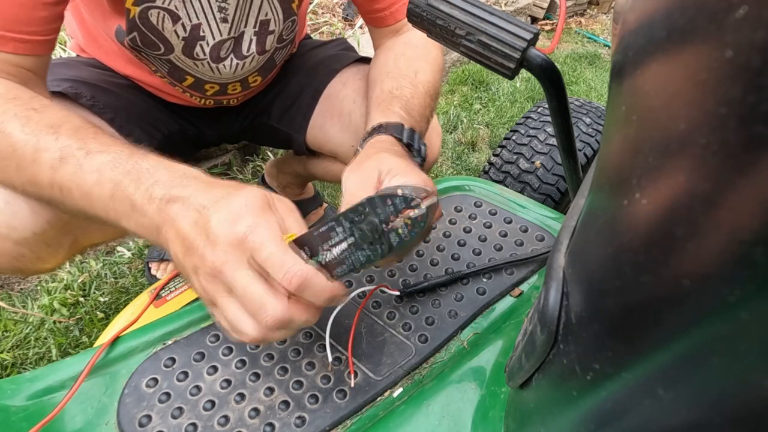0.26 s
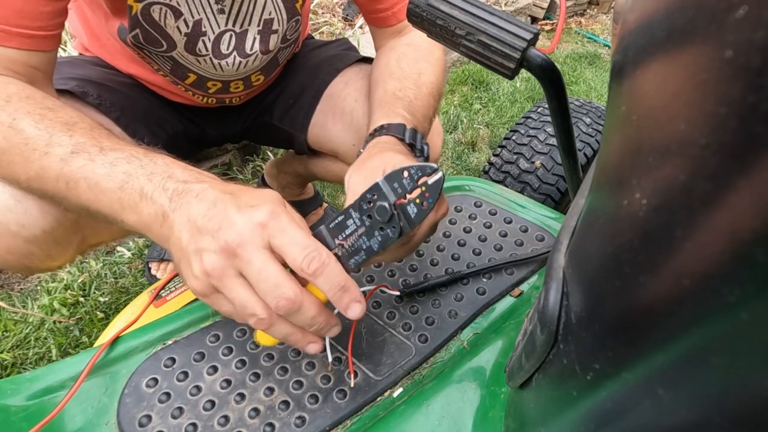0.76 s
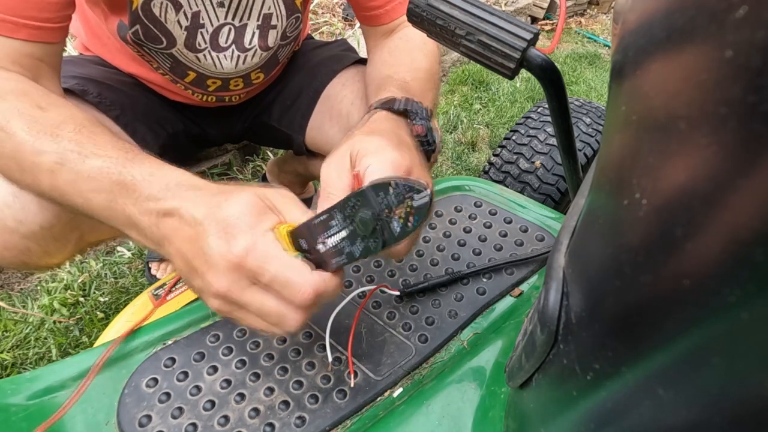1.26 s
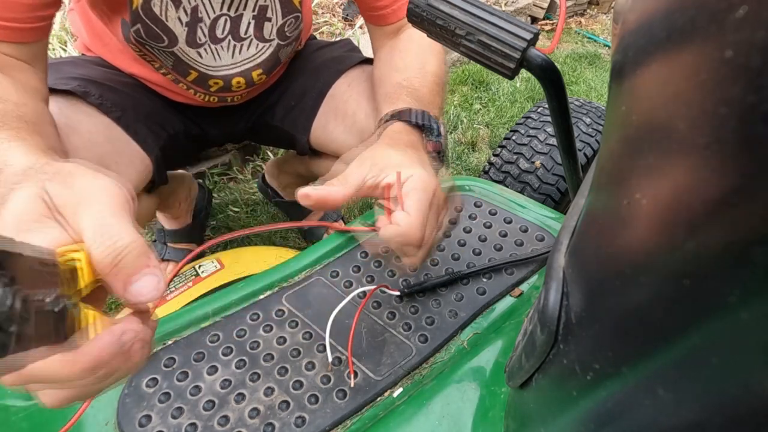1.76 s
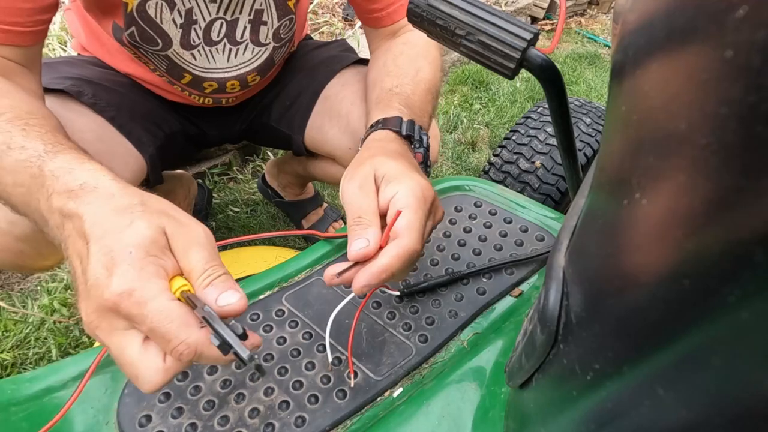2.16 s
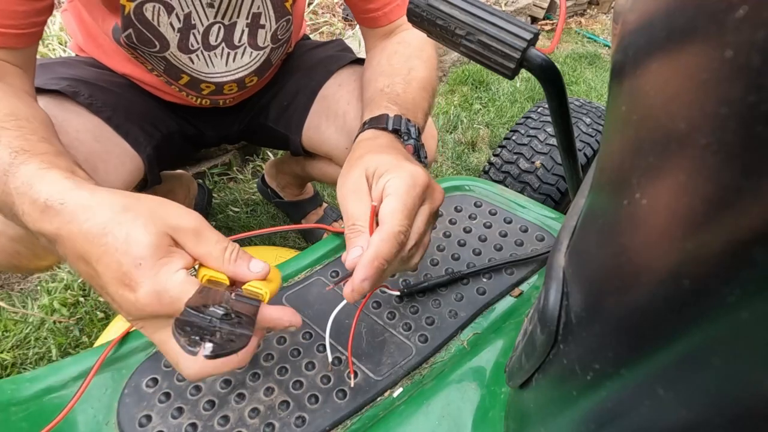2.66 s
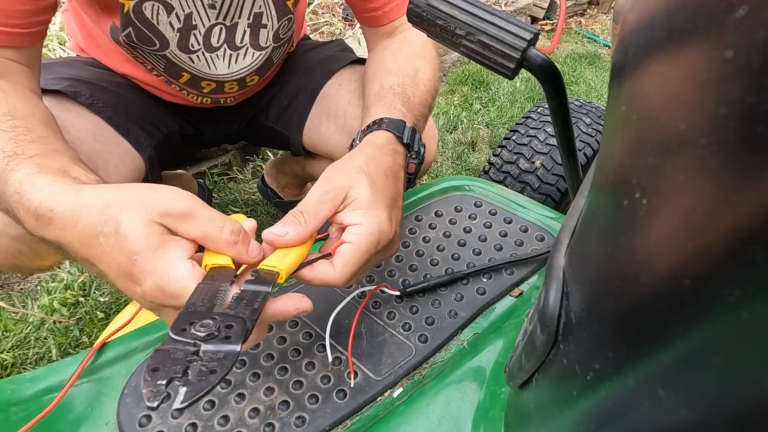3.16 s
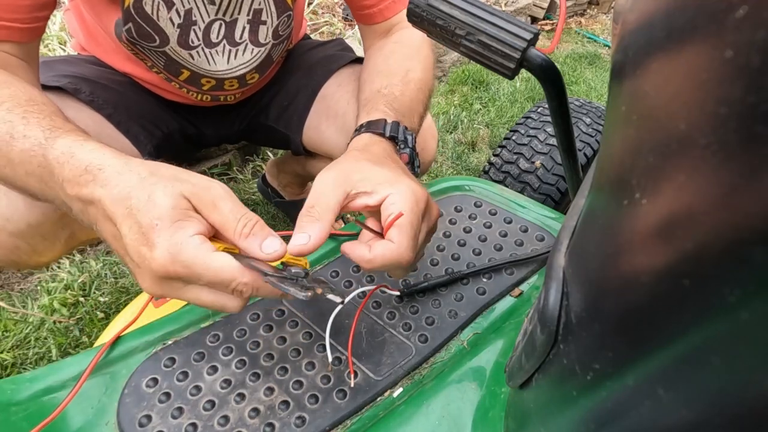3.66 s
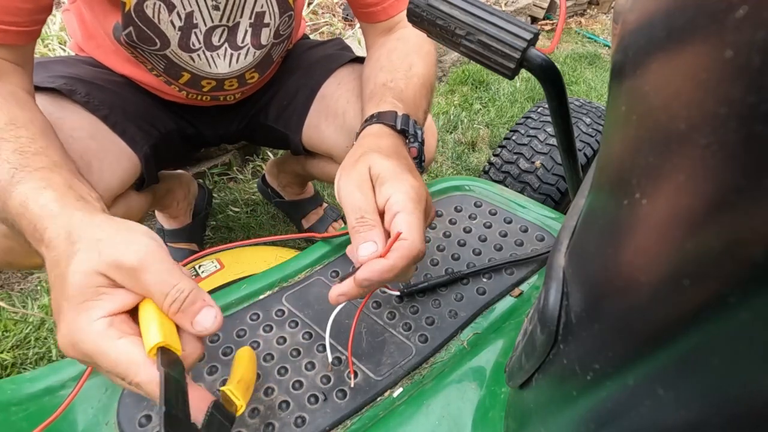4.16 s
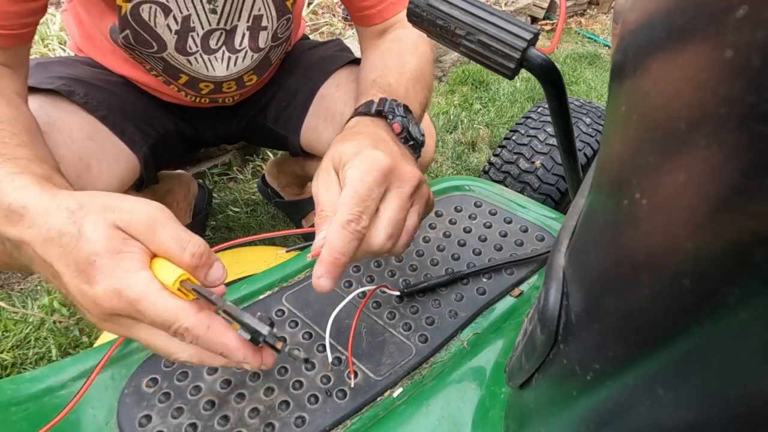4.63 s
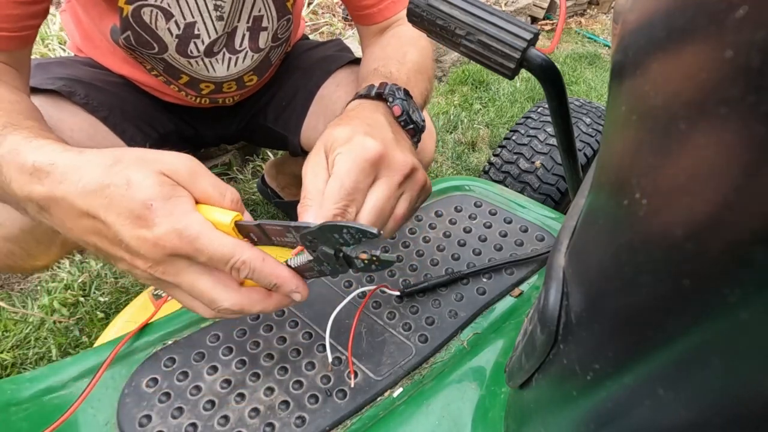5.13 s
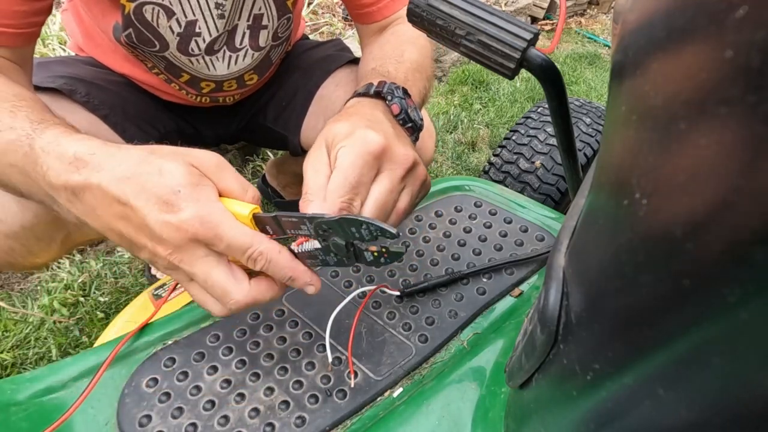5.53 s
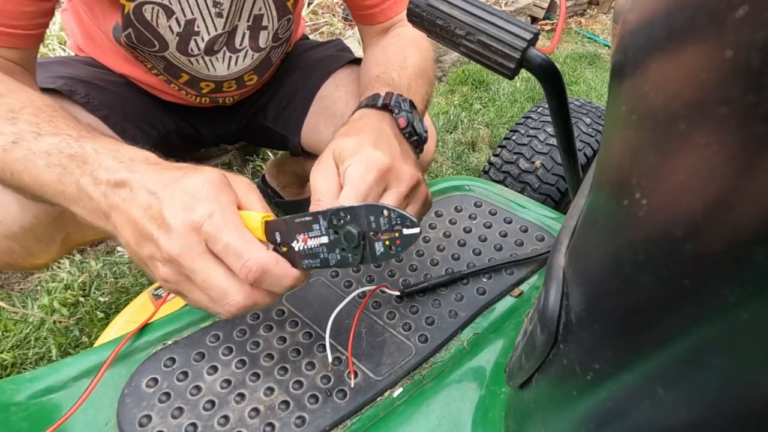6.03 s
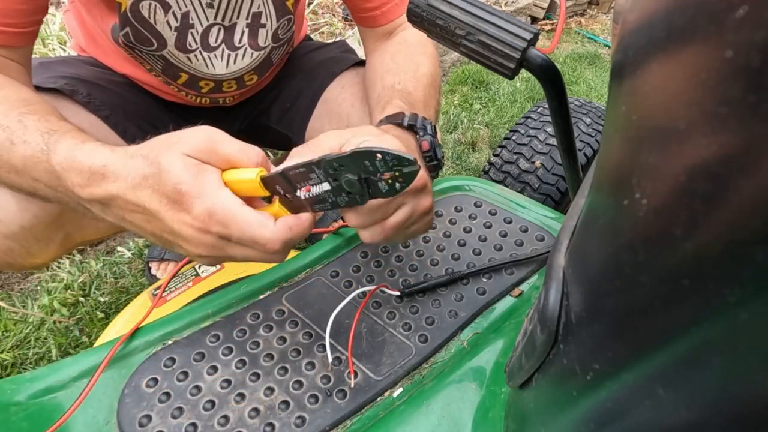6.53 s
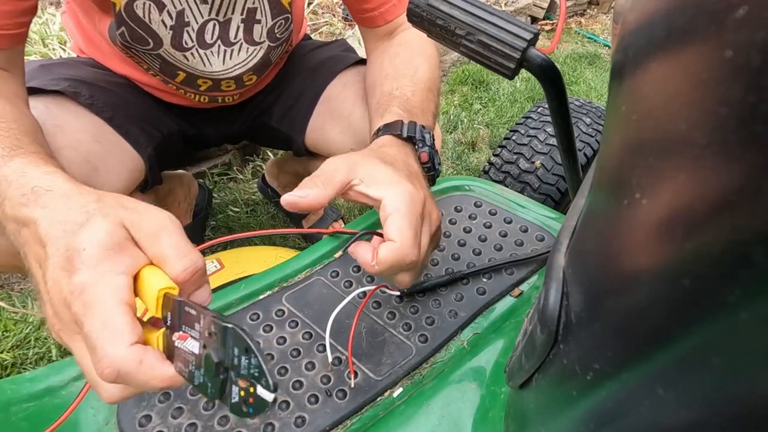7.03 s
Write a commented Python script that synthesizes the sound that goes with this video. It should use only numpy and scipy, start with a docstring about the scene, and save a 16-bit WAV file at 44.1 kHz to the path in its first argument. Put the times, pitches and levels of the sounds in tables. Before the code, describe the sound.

Hand wire strippers click and snap close by, bumping a hollow mower body, while an engine runs some way off outdoors.

```python
"""A tool knocks on a hollow body and steel jaws click, close to the microphone: someone crouches on
a lawn by a parked riding mower, stripping wires. The hand strippers snap and ring, bump the mower's
panels, and near the end drag a sleeve of insulation off the copper. Some way off an engine runs,
creeping up in speed, beside a fainter machine hum. Air buffets the microphone; small birds call far away."""
import sys
import numpy as np
from scipy import signal
from scipy.fft import rfft, irfft
from scipy.io import wavfile
from scipy.ndimage import uniform_filter1d

SR = 44100
rng = np.random.default_rng(int(sys.argv[2]) if len(sys.argv) > 2 else 0)


def bounce(signal):
    """Save signal as a 16-bit WAV file at the path given by the first command-line argument."""
    frames = np.transpose(np.atleast_2d(signal))
    limited = np.clip(frames, -1, 1)
    pcm = np.round(limited * 32767).astype(np.int16)
    wavfile.write(sys.argv[1], SR, pcm)


N = 321489

# How alike noise is at the two sides of the microphone. Each row: frequency in Hz, correlation.
LIKENESS = [(60, 0.97), (150, 1), (380, 0.94), (950, 0.72), (2380, 0.45), (5980, 0.67), (15000, 0.1)]
# Distant outdoor wash. Each row: frequency in Hz, relative density in dB.
WASH_SPECTRUM = [(180, -34.5), (300, -1.5), (450, -9), (850, -8), (980, -5), (1200, -9), (1750, -14.5),
                 (4200, -18), (7400, -23.5), (8200, -31.5), (10000, -32.5), (12500, -42.5), (13800, -48),
                 (16000, -62)]
# The wash swells slightly. Each row: time in seconds, gain in dB.
WASH_SWELL = [(0.3, -0.6), (0.9, 0.4), (2.8, 0.5), (3.5, 0), (7.29, 0)]
# Low rumble of air and engine. Each row: frequency in Hz, relative density in dB.
RUMBLE_SPECTRUM = [(10, -24), (24, 17), (45, 5.5), (65, 6), (110, 1.5), (190, -6.5), (260, -14.5),
                   (380, -41.5), (700, -68.5)]
# Far birds. Each row: start and length in seconds, first and last pitch in Hz, level in dB.
CHIRPS = [(0.463, 0.062, 2600, 2180, -56), (0.566, 0.11, 2140, 2660, -62), (0.965, .07, 2260, 2390, -66),
          (1.014, .034, 3260, 3370, -54.5), (1.05, 0.06, 2520, 2330, -60.5),
          (5.732, 0.027, 3420, 3430, -60), (5.75, 0.025, 3340, 3220, -49), (5.768, 0.017, 3260, 3370, -48),
          (5.801, 0.075, 3280, 3330, -55), (5.776, .025, 2380, 2130, -60), (5.792, 0.047, 2150, 2100, -57),
          (5.872, 0.026, 2680, 2600, -56), (5.894, 0.034, 2240, 2430, -56), (6.8, 0.15, 3420, 3450, -60)]
# A second machine, far off. Each row: frequency in Hz, relative level in dB.
HUM_LINES = [(273.5, -54), (328, -57.5), (383, -57.5), (537, -61), (657, -65), (772, -62.5)]
# The engine's firing tone at the microphone. Each row: time in seconds, level in dB.
FIRING_LEVEL = [(0, -37.5), (0.4, -33), (0.7, -25.5), (0.98, -25), (1.13, -38), (1.32, -20.5), (1.55, -32),
                (1.77, -23), (2.1, -27.5), (2.9, -29.5), (3.75, -26.5), (4.25, -30.5), (4.58, -29),
                (4.85, -31), (5.8, -25), (6.4, -29.5), (7.29, -29)]
# The octave above that tone. Each row: time in seconds, relative level in dB.
OCTAVE_LEVEL = [(0, -47.5), (0.8, -38.5), (1.5, -36.5), (2.12, -41), (2.3, -33), (2.6, -37), (2.95, -40),
                (3.5, -49.5), (6.1, -46.5), (7.29, -51.5)]
# Other engine orders. Each row: multiple of the firing rate, level in dB against the octave.
ENGINE_ORDERS = [(0.702, -9), (1.502, -23), (2.498, -19.5), (3, -34.5), (4.002, -36.5)]
# Air on the microphone. Each row: centre in seconds, level in dB, length in seconds, upper edge in Hz.
BUFFETS = [(2.152, -25.5, 0.08, 129), (2.495, -27.5, .2, 44.6), (3.039, -17.5, 0.11, 68),
           (3.086, -22, 0.042, 70), (3.163, -22, 0.07, 105), (3.2, -21.5, 0.072, 54.5),
           (3.488, -33.5, 0.16, 49.7), (4.598, -25.5, .08, 86), (6.994, -32, .2, 48.5)]
# Soft jolts of the microphone. Each row: time in seconds, relative level in dB, strongest frequency in Hz.
BUMPS = [(3.031, -6, 64.5), (3.046, -10, 75), (3.056, -8, 110), (3.075, -10, 70.6), (3.188, -6.5, 101),
         (3.249, -15.5, 98), (4.16, -1, 93), (4.387, -3.5, 49.7)]
# Fingers sliding on wire and grips. Each row: start and length in seconds, level in dB.
FINGER_RUBS = [(1.07, 0.077, -72), (1.176, 0.12, -68), (1.7, 0.2, -71), (2.12, .06, -72), (2.45, 0.2, -75),
               (3.478, .09, -73), (3.68, 0.06, -71), (4.394, 0.14, -69), (5.566, .09, -76),
               (6.928, .08, -76)]
# Jaws scraping the sleeve. Each row: time in seconds, resonance in Hz, level in dB.
SCRAPE_PATH = [(6.42, 4300, -74), (6.48, 4400, -65), (6.55, 4750, -64), (6.61, 5050, -65),
               (6.68, 5150, -70)]
# Resonances of the dragging insulation. Each row: centre and width in Hz, relative level in dB.
DRAG_MODES = [(1270, 80, 4), (3400, 260, 0), (4550, 700, -5)]
# Blows on the mower. Each row: start in seconds, relative level in dB, lowest and highest frequency
# driven in Hz, gain of ring and shudder in dB, the struck panel's note in Hz, its relative level in dB.
KNOCKS = [(.0065, -25, 600, 1610, -8, 265, -31.5), (0.0362, -18.5, 930, 2260, -6.5, 267, -31),
          (1.758, -25.5, 810, 3080, -3.5, 960, -43), (3.05, -39, 200, 400, -14, 260, -28),
          (4.1567, -15.5, 382, 1700, -7.5, 1520, -30), (4.382, -16, 260, 3330, -3.5, 1180, -18),
          (4.393, -18, 1200, 1800, -5, 1310, -35), (4.401, -22, 800, 2580, 2.5, 1140, -32),
          (4.492, -37, 700, 1600, -5, 1400, -43), (4.656, -34, 950, 1350, -15, 1174, -44)]
# Modes of the mower's hollow body. Each row: frequency in Hz, relative level in dB, t60 in seconds.
BODY_MODES = [(125, 10.5, 0.095), (182.5, 7.5, 0.12), (225, 7, 0.36), (237, 16.5, 0.062),
              (278.5, -3.5, 0.36), (327, -8.5, 0.41), (369, 9.5, 0.073), (438, 2.5, 0.098),
              (503, 11, 0.028), (784, -17, 0.3), (977, -9.5, 0.19), (1156, 4, 0.034), (1233, -2, 0.045),
              (1370, -18, .09), (1570, -21, .11), (2480, -18, .07), (3730, -21, .023)]
# Shudder of its loose panels. Each row: frequency in Hz, relative gain in dB.
PANEL_COLOUR = [(120, -27), (220, 10), (380, 5.5), (600, -6.5), (1400, -9.5), (2500, -19), (6000, -54)]
# Colour of every blow. Each row: frequency in Hz, relative gain in dB.
KNOCK_COLOUR = [(230, 2.5), (480, -0.5), (640, -4.5), (900, -8), (1250, -5.5), (2200, -11), (3600, -5.5),
                (8500, -12.5), (14000, -26)]
# Snaps that leave the blades free to ring. Each row: start in seconds, relative level in dB.
BLADE_RINGS = [(1.6985, -50), (1.719, -45)]
# Modes of the free blades. Each row: frequency in Hz, relative level in dB, t60 in seconds.
BLADE_MODES = [(1920, -9, .12), (2080, -1.5, 0.26), (2330, -1, .14), (2780, -3, 0.063), (4480, -7, 0.18),
               (4820, -2, 0.1), (5200, -10, .09), (7250, -9, .05)]
# Broad resonances of the steel jaws. Each row: frequency in Hz, height in dB.
JAW_RESONANCES = [(2830, 4), (3650, -1.5), (4400, -0.5), (6400, 4.5), (6900, 3), (7450, 6.5)]
# Colour of every click above its body. Each row: frequency in Hz, relative gain in dB.
CLICK_COLOUR = [(2200, -8.5), (4300, -4.5), (7400, -16), (8400, -16), (12000, -26), (16000, -42)]
# Close clicks of the strippers. Each row: time in seconds, relative level in dB, body at 1 kHz in dB,
# treble tilt in dB per octave, rattle t60 in seconds, leading jaw mode in Hz, its height in dB.
CLICKS = [(0.111, -14, -3, -5, 0.06, 3300, 6), (0.117, -14, 6, -9, 0.1, 1950, 13),
          (1.0223, -39.5, -10, 19, .018, 11000, 11), (1.088, -22, 8, 3.5, .015, 9000, 12),
          (1.1948, -5.5, -18, 0, 0.01, 2100, 7), (1.394, 6.5, -13, 0, 0.011, 2150, 6),
          (1.544, -19, 4, 2, .013, 6500, 9), (1.5727, -13, -5, -7, .05, 2930, 6),
          (1.582, -14, -10, -4, 0.037, 3000, 7), (1.5976, -5, -12, -1, .02, 2400, 13),
          (1.651, 0, -35, -8, 0.022, 3260, 5), (1.698, 6.5, -4.5, 3, 0.019, 3330, 5),
          (1.7174, -7, 5, 0, 0.058, 4900, 11), (1.809, -17, -1, -5, .025, 2650, 9),
          (1.848, -12, 9, 3, 0.088, 4600, 8), (3.99, -6, -5, 3, 0.038, 2220, 11.5),
          (4.382, -6, -10, -3.5, 0.0072, 3400, 9), (4.4015, -14, -5, 0, .01, 4800, 6),
          (6.0182, -15.5, 2, 10, 0.022, 3050, 13.5), (6.029, -17, -10, -2, 0.016, 5970, 5),
          (6.597, -18.5, -17, 0, .022, 4520, 12.5), (6.6252, -12, -12, -1.5, .013, 4400, 8.5),
          (6.6558, -13, -2, -2.5, 0.01, 4460, 13), (6.712, -13, -1, -5, .02, 4400, 4),
          (6.7366, -10, -6, -5, .012, 4400, 8), (6.7382, -4, -6, -1.5, 0.016, 4400, 13.5),
          (6.7814, 0, -20, -2.5, 0.012, 4330, 14.5), (6.812, -5, -12, -11, 0.016, 3980, 14),
          (6.8143, -3.5, -17, 1.5, 0.014, 3970, 13.5), (6.821, 0, 0, 3.5, 0.025, 6370, 10.5),
          (6.8245, -12.5, 8, 0, 0.028, 850, 4), (6.878, -23, 15, -17, 0.26, 550, 5)]


def amp(db):
    """Decibels to gain."""
    return 10 ** (np.asarray(db) / 20)


def unit(x):
    """Scales to rms 1."""
    return x / np.sqrt(np.mean(x ** 2) + 1e-20)


def curve(rows, column=1):
    """One column of a time table at every sample."""
    rows = np.array(rows)
    return np.interp(np.arange(N) / SR, rows[:, 0], rows[:, column])


def spectrum(points, hz):
    """Reads (Hz, value) points on a log-frequency axis."""
    f, value = np.transpose(points)
    return np.interp(np.log(hz + 1), np.log(f + 1), value)


def peak(hz, centre_hz, half_width_hz):
    """A resonance curve of height 1."""
    return 1 / (1 + ((hz - centre_hz) / half_width_hz) ** 2)


def add(mix, s, sound):
    """Mixes a sound in at s seconds."""
    part = mix[..., max(round(s * SR), 0):][..., :sound.shape[-1]]
    part += sound[..., :part.shape[-1]]


def drift(hz):
    """Slow random wandering of rms 1, up to about hz."""
    f = np.fft.rfftfreq(N, 1 / SR)
    return unit(irfft(rfft(rng.standard_normal(N)) / (1 + (f / hz) ** 4), N))


def coloured(stereo, gain_db, size=2048):
    """Filters causally with the given gain on an even frequency grid."""
    cepstrum = irfft(np.log(amp(np.maximum(gain_db, -100))))
    cepstrum[1:size // 2] *= 2
    cepstrum[size // 2 + 1:] = 0
    response = irfft(np.exp(rfft(cepstrum)))
    return signal.fftconvolve(stereo, response[None], axes=1)


def left_right(mid, side):
    """Mid and side to a stereo pair."""
    return np.array([mid + side, mid - side])


def stereo_noise(gain):
    """Noise of rms 1 with the spectrum gain(Hz), most alike left and right in the bass."""
    hz = np.fft.rfftfreq(N, 1 / SR)
    common, apart = rfft(rng.standard_normal((2, N))) * gain(hz)
    same = np.clip(spectrum(LIKENESS, hz), 0, 1)
    return unit(irfft(left_right(common * np.sqrt(1 + same), apart * np.sqrt(1 - same)), N))


def rattle(envelope, bins):
    """A dense run of tiny contacts under the envelope, its colour evened out over `bins`."""
    z = rfft(rng.standard_normal(len(envelope)) * envelope, 2 * len(envelope))
    z /= np.sqrt(uniform_filter1d(abs(z) ** 2, bins) + 1e-12)
    return irfft(z)[:len(envelope)]


def open_air(wash_db=-50.5, rumble_db=-34, gust_db=-35, gust_edge_hz=55, fall_db_per_s=1.15):
    """A distant wash, a steady rumble and deep gusts; wash and gusts ease as the breeze dies down."""
    calm_db = fall_db_per_s * np.arange(N) / SR
    wash = stereo_noise(lambda hz: amp(spectrum(WASH_SPECTRUM, hz)))
    wash *= amp(wash_db + curve(WASH_SWELL) - 0.13 * calm_db + 0.83 * drift(10.3))
    deep = lambda hz: 1 / np.sqrt(1 + (hz / gust_edge_hz) ** 8)
    rumble = stereo_noise(lambda hz: amp(spectrum(RUMBLE_SPECTRUM, hz)) * np.sqrt(1 - deep(hz) ** 2))
    gusts = stereo_noise(lambda hz: amp(spectrum(RUMBLE_SPECTRUM, hz)) * deep(hz))
    return wash + rumble * amp(rumble_db) + gusts * amp(gust_db - calm_db + 4 * drift(2))


def far_birds(warble=0.013, flutter_db=2, echo_db=-7, echo_t60=0.91):
    """Thin fluttering whistles from far off, blurred by the trees."""
    calls, waver = np.zeros(N), drift(90)
    for s, length, start_hz, end_hz, db in CHIRPS:
        count = int(length * SR)
        hz = np.linspace(start_hz, end_hz, count) * (1 + warble * waver[int(s * SR):][:count])
        whistle = np.sin(2 * np.pi * np.cumsum(hz) / SR)
        add(calls, s, amp(db) * signal.windows.tukey(count, .6) * whistle)
    calls *= amp(flutter_db * drift(60))
    trees = rng.standard_normal((2, SR // 2)) * amp(-60 * np.arange(SR // 2) / SR / echo_t60)
    echo = signal.fftconvolve(calls[None], trees / np.linalg.norm(trees[0]), axes=1)[:, :N]
    return calls + amp(echo_db) * echo


def far_hum(on_s=0.62, off_s=3.3, ramp_s=0.3, fade_db_per_s=3.5, rest_db=-16):
    """Another machine comes up, fades and sinks to a faint rest, fluttering on its way through the air."""
    t, lines = np.arange(N) / SR, np.zeros(N)
    for hz, db in HUM_LINES:
        flutter = unit(1 + 0.4 * drift(3) + 0.38 * drift(22))
        lines += amp(db) * flutter * np.sin(2 * np.pi * (hz * t + 0.22 * drift(2.26)))
    gate = np.clip(np.minimum(t - on_s, off_s - t) / ramp_s, 0, 1)
    fade = amp(3 - fade_db_per_s * (t - on_s))
    return np.sqrt(2) * lines * np.maximum(gate * fade, amp(rest_db))


def far_engine(slow_hz=73.9, fast_hz=93.75, midway_s=2.45, ease_s=2.3):
    """Exhaust some way off, its firing rate easing up: only low orders carry, wavering on the way."""
    ease = (1 + np.tanh((np.arange(N) / SR - midway_s) / ease_s)) / 2
    turns = np.cumsum(slow_hz + (fast_hz - slow_hz) * ease) / SR + 0.032 * drift(3.5)
    firing = amp(curve(FIRING_LEVEL)) * np.sin(2 * np.pi * turns)
    upper = np.sin(4 * np.pi * turns)
    for multiple, db in ENGINE_ORDERS:
        upper += amp(db) * (1 + .5 * drift(11)) * np.sin(2 * np.pi * (multiple * turns + rng.random()))
    upper *= amp(curve(OCTAVE_LEVEL) + 0.65)
    flutter = 1 + 0.075 * drift(60)
    return np.sqrt(2) * (firing + upper) * flutter


def microphone_buffets(left_db=-6):
    """Dull pushes of air and soft one-swing bumps on the microphone itself, mostly on the right."""
    out, t = np.zeros(N), np.arange(-SR // 20, SR // 20) / SR
    for s, db, length, hz in BUFFETS:
        count = int(length * SR)
        band = signal.butter(3, [22, hz], "band", fs=SR, output="sos")
        push = signal.sosfilt(band, rng.standard_normal(SR))[-count:]
        add(out, s - length / 2, amp(db) * unit(push * np.hanning(count)))
    for s, db, hz in BUMPS:
        angle = 2 * np.pi * hz * t
        add(out, s + t[0], -amp(db) * angle / (1 + angle ** 2) ** 2)
    return out * amp([[left_db], [0]])


def finger_rubs(centre_hz=10500, width_hz=2300, grain_db=4):
    """Dry skin hisses briefly over plastic, close by."""
    strokes = np.zeros(N)
    for s, length, db in FINGER_RUBS:
        add(strokes, s, amp(db) * np.hanning(int(length * SR)))
    hiss = stereo_noise(lambda hz: np.exp(-((hz - centre_hz) / width_hz) ** 2 / 2))
    return hiss * strokes * amp(grain_db * drift(150))


def jaw_scrape(width_hz=700, slips_per_s=700):
    """Tiny slips of the jaws on the sleeve ring a resonance that climbs as the wire tightens."""
    t = np.arange(N) / SR
    slips = rng.standard_normal(N) * (rng.random(N) < slips_per_s / SR)
    carrier = np.exp(2j * np.pi * np.cumsum(curve(SCRAPE_PATH)) / SR)
    pole = np.exp(-np.pi * width_hz / SR)
    # a moving resonance: shift down, low-pass, shift back up
    ring = carrier * signal.lfilter([1], np.poly([pole, pole]), slips / carrier + 1e-18)
    scraping = (t > SCRAPE_PATH[0][0]) * (t < SCRAPE_PATH[-1][0])
    return unit(ring.real) * amp(curve(SCRAPE_PATH, column=2)) * scraping


def insulation_drag(start_s=6.57, peak_s=6.73, end_s=6.94, level_db=-51, grain_db=3):
    """The plastic sleeve sticks and slips along the copper, harder and harder until it lets go."""
    rub = stereo_noise(lambda hz: sum(amp(db) / np.sqrt(width) * peak(hz, centre, width / 2)
                                      for centre, width, db in DRAG_MODES))
    pull = np.interp(np.arange(N) / SR, [start_s, peak_s, end_s], [0, 1, 0])
    return rub * pull * amp(level_db + grain_db * drift(60))


def mower_knocks(crack_t60=0.052, shudder_t60=0.3, travel_s=0.0024, left_lag_s=.00009, note_cycles=48):
    """A close blow cracks, rings the struck panel and hollow body, and sets loose panels shuddering."""
    out, t, grid = np.zeros((2, N)), np.arange(SR // 2) / SR, np.fft.rfftfreq(2048, 1 / SR)
    ring = np.zeros((2, len(t)))
    # bending waves disperse: low modes arrive last, and neighbouring modes swing opposite ways
    for k, (hz, db, t60) in enumerate(BODY_MODES):
        delay = travel_s * np.sqrt(BODY_MODES[0][0] / hz) + np.array([[left_lag_s], [0]])
        swing = (-1) ** k * np.sin(2 * np.pi * hz * np.maximum(t - delay, 0))
        ring += amp(db - 1.5 - 60 * t / t60) * swing
    crack_fade, shudder_fade = amp(-60 * t / crack_t60), amp(-60 * t / shudder_t60)
    crack_band = signal.butter(1, [350, 2000], "band", fs=SR)
    for s, db, low_hz, high_hz, ring_db, note_hz, note_db in KNOCKS:
        crack = left_right(rattle(crack_fade, bins=300), 0.27 * rattle(crack_fade, bins=300))
        crack = amp(34) * signal.lfilter(*crack_band, crack)
        shudder = left_right(rattle(shudder_fade, bins=60), 0.5 * rattle(shudder_fade, bins=60))
        shudder = coloured(shudder, 32 + spectrum(PANEL_COLOUR, grid))[:, :len(t)]
        # a lighter contact drives less bass, a harder one reaches higher
        bass = 1 / np.hypot(1, (low_hz / np.maximum(grid, KNOCK_COLOUR[0][0])) ** 2)
        treble = 1 / np.hypot(1, (grid / high_hz) ** 8) + amp(-14.5)
        shape_db = db + spectrum(KNOCK_COLOUR, grid) + 20 * np.log10(bass * treble)
        add(out, s, coloured(crack + amp(ring_db) * (ring + shudder), shape_db))
        add(out, s, amp(note_db - 60 * t * note_hz / note_cycles) * np.sin(2 * np.pi * note_hz * t))
    return out * amp([[-2], [-0.3]])


def blade_rings(chatter_db=5, chatter_hz=200, waver_turns=0.29, right_db=-1):
    """The strippers' two thin steel halves ring briefly, chattering against each other."""
    out, t = np.zeros(N), np.arange(SR // 4) / SR
    wobble = drift(chatter_hz)
    for s, db in BLADE_RINGS:
        for hz, mode_db, t60 in BLADE_MODES:
            swell, waver = (wobble[at:at + len(t)] for at in rng.integers(0, N - len(t), size=2))
            envelope = amp(db + mode_db - 60 * t / t60 + chatter_db * swell)
            add(out, s, envelope * np.sin(2 * np.pi * (hz * t + waver_turns * waver)))
    return out * amp([[0], [right_db]])


def stripper_clicks(give_s=.0007, snap_s=0.00067, snap_share=0.46, scatter_db=-20, scatter_t60=0.2):
    """Close up, the sleeve gives way and the hand-damped steel snaps and rattles; one jaw mode leads."""
    out, hz = np.zeros((2, N)), np.fft.rfftfreq(2048, 1 / SR)
    t = np.arange(-SR // 200, SR // 6) / SR
    after, build_up = np.maximum(t, 0), np.exp(np.minimum(t, 0) / give_s)
    treble_octaves = np.log2(np.maximum(hz / 3000, 1))
    jaw_db = sum(height_db * peak(hz, centre, 200) for centre, height_db in JAW_RESONANCES)
    top_octave = signal.butter(2, 11000, "high", fs=SR)
    # snap, rattle, and weak scatter from the mower and the ground
    energies = np.array([snap_share, 1 - snap_share, amp(scatter_db) ** 2])
    for s, db, body_db, tilt_db, t60, lead_hz, lead_db in CLICKS:
        decays = [np.exp(-after / snap_s), amp(-60 * after / t60), amp(-60 * after / scatter_t60)]
        parts = build_up * np.array(decays)
        parts /= np.linalg.norm(parts, axis=1, keepdims=True)
        envelope = np.sqrt(energies @ parts ** 2)
        mid, side = rattle(envelope, bins=400), rattle(envelope, bins=400)
        side = .35 * side + signal.lfilter(*top_octave, side)  # left and right differ most up here
        body = [(120, body_db - 42), (450, body_db), (1000, body_db)]
        shape_db = spectrum(body + CLICK_COLOUR, hz) + tilt_db * treble_octaves
        shape_db += jaw_db + lead_db * peak(hz, lead_hz, 330)
        add(out, s + t[0], coloured(left_right(mid, side), db + 1 + shape_db))
    return out


def scene():
    """Close handwork on the lawn, over far machines, open air and birds."""
    background = far_engine() + far_hum() + open_air() + microphone_buffets()
    impacts = stripper_clicks() + blade_rings() + mower_knocks()
    friction = insulation_drag() + jaw_scrape() + finger_rubs()
    return background + impacts + friction + far_birds()


def record(dry, edge_hz=15900):
    """The microphone chain: soft ends and a steep cut of the highest treble."""
    ends = signal.windows.tukey(N, .001)
    low_pass = signal.firwin(511, edge_hz, window=("kaiser", 9), fs=SR)
    return signal.oaconvolve(dry * ends, low_pass[None], "same")


dry = scene()
out = record(dry)
bounce(out)
```